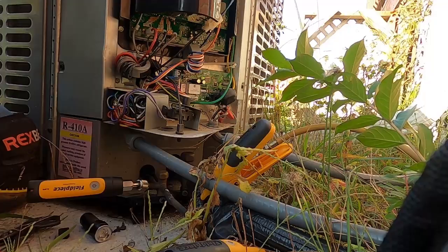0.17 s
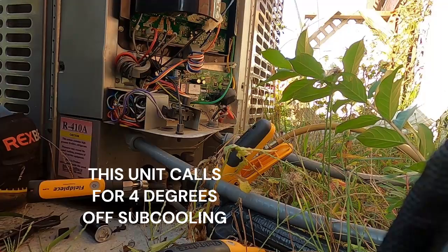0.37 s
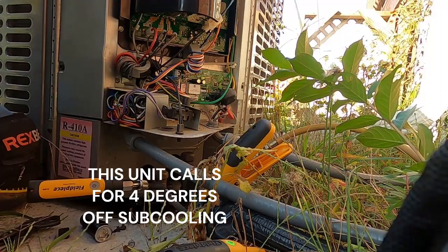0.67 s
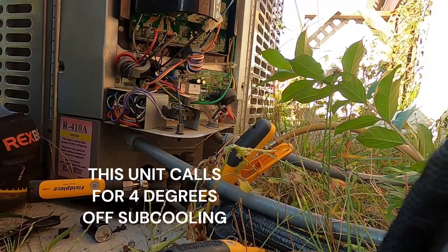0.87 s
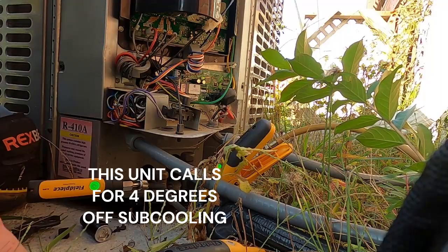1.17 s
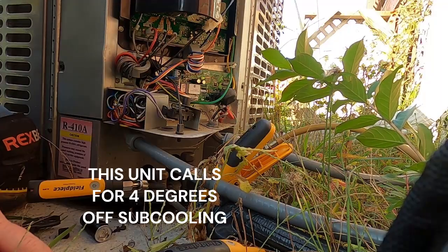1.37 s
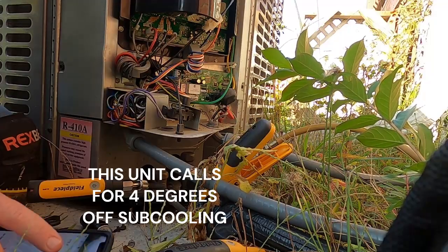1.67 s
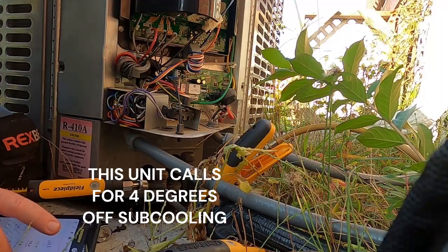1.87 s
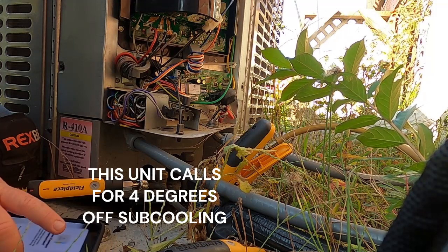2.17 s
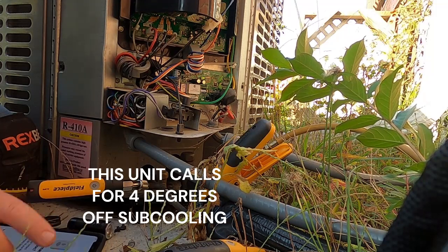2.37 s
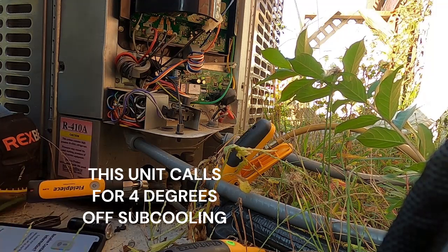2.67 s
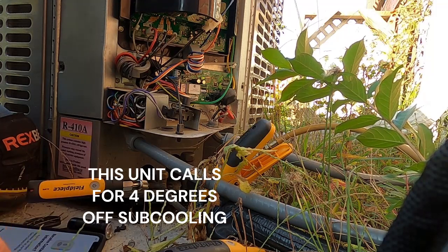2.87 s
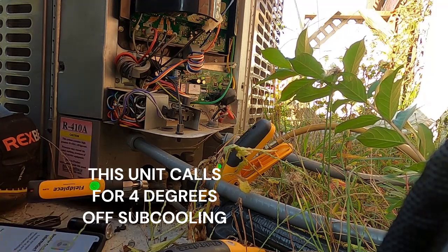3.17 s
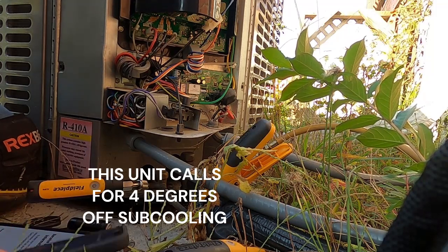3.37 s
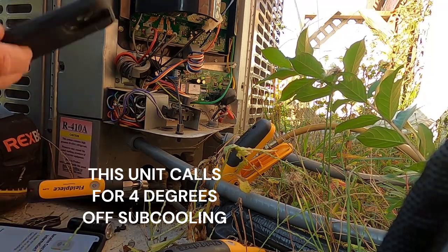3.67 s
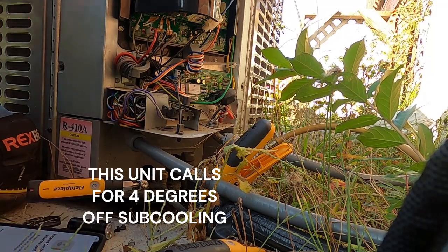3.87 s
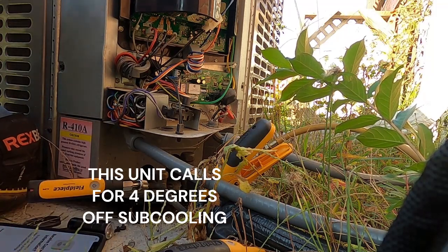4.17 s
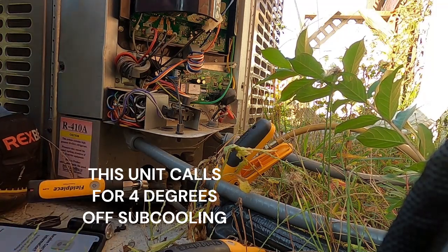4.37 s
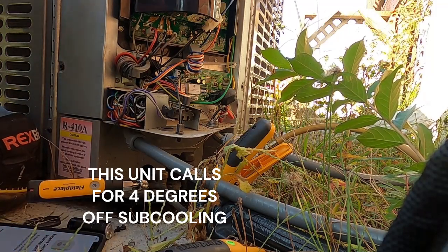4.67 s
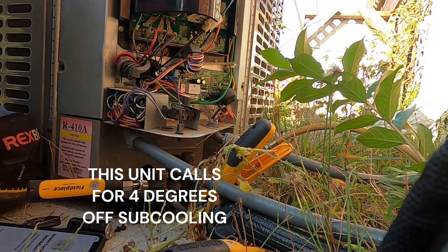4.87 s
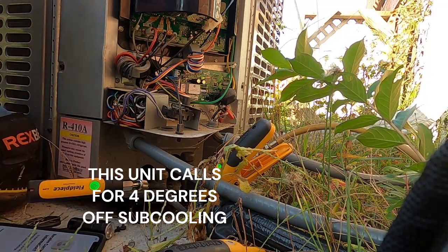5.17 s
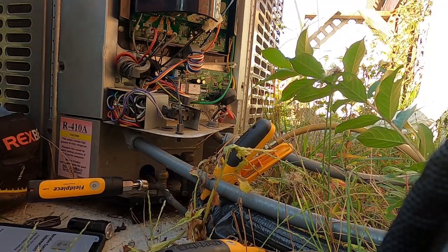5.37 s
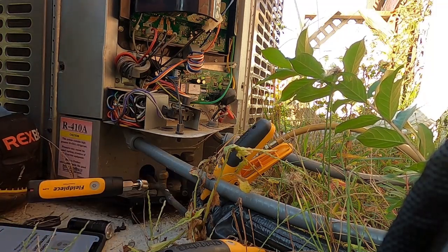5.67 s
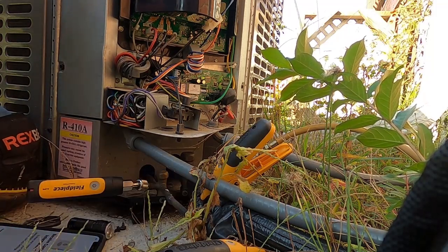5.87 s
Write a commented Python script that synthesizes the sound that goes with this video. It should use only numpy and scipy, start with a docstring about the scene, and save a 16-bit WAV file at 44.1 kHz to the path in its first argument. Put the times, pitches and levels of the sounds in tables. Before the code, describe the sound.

An outdoor air-conditioning unit runs close to the microphone for the whole six seconds. Its compressor and fan make a low, even hum with a steady rush of air, and a thin, very high electronic whine sits mostly on the right. A very short, brighter rush opens the sound and stops abruptly. One motor rises slightly in pitch over the first two seconds, and the airy hiss gradually gets a little brighter. At about 1.9 seconds fingertips make a quick, crisp cluster of clicks on a phone nearby. At 2.4 seconds the phone is set down on concrete with a light clack and a small thump. A faint high whistle swells near 2.8 seconds and fades. Tiny ticks follow around 3.5 seconds and between 4.4 and 4.9. A light breeze gives soft, low puffs on the microphone, most clearly near 1.9 and 5.6 seconds.

```python
"""Outdoors, an air-conditioning unit runs beside a small camera. Its compressor and fan hum (one motor is still
speeding up at first), air rushes through the coil, and the inverter, its power electronics, whines near 12 kHz
in bursts at twice the mains rate, mostly from the right. A short bright burst of noise sounds at the very start
and breaks off, a light breeze puffs at the microphones and a faint whistle swells and fades. Close by,
fingertips tick on a phone and set it down on the concrete."""
import sys
import numpy as np
from scipy import signal
from scipy.fft import rfft, irfft, next_fast_len
from scipy.io import wavfile
from scipy.ndimage import uniform_filter1d, map_coordinates

SR = 44100
rng = np.random.default_rng(int(sys.argv[2]) if len(sys.argv) > 2 else 0)


def materialize(psi):
    """Save the field psi as 16-bit PCM at rate SR to the path in sys.argv[1].

    A 1-D psi becomes a single channel; in a 2-D psi each row is a channel.
    """
    bounded = np.clip(np.atleast_2d(psi).T, -1, 1)
    quanta = np.round(bounded * 32767).astype(np.int16)
    wavfile.write(sys.argv[1], SR, quanta)


N = 265746
t = np.arange(N) / SR

# Something, probably a hand, shades the camera from the unit, then moves away: (time [s], shade [0-1])
SHADE = [(0, 0.49), (1.6, 0.38), (1.9, 0.22), (3.3, 0.1), (4.4, 0.05), (6.1, 0)]


def amp(db):
    """Turn decibels into a gain to multiply by."""
    return 10 ** (np.asarray(db) / 20)


def unit(x):
    """Scale x to an average (rms) level of 1."""
    return x / np.sqrt(np.mean(x ** 2) + 1e-20)


def over_pitch(rows, hz):
    """Read a (frequency, value) table at hz, on a log scale."""
    freqs, values = np.transpose(rows)
    return np.interp(np.log(hz + 1), np.log(freqs + 1), values)


def over_time(rows):
    """Read a (time, value) table at every sample."""
    return np.interp(t, *np.transpose(rows))


def wobble(rate):
    """A smooth random curve through `rate` points a second."""
    coarse = t[::64]
    return np.interp(t, coarse, map_coordinates(rng.standard_normal(400), [coarse * rate]))


def filtered(x, response):
    """Scale each frequency in x by response(frequency)."""
    size = next_fast_len(x.shape[-1] + 8192)
    return irfft(rfft(x, size) * response(np.fft.rfftfreq(size, 1 / SR)), size)[..., :x.shape[-1]]


def resonance(f, centre_hz, width_hz):
    """A response that favours frequencies near the centre."""
    return 1j * f * width_hz / (centre_hz ** 2 - f * f + 1j * f * width_hz)


def motor_turns(full_hz=49.87, slow_share=0.045, spin_up_s=2.15):
    """Count the motor's turns: it starts a little slow and climbs to a slightly unsteady full speed."""
    speed = full_hz * (1 - slow_share * np.clip(1 - t / spin_up_s, 0, 1) + .001 * wobble(9))
    return np.cumsum(speed) / SR


def tones(multiples, levels, turns, waver_db, drift_rad):
    """Pure tones at multiples of a turning speed, each wavering in level and phase."""
    shade, out = over_time(SHADE), np.zeros(N)
    for multiple, (db, shade_db) in zip(multiples, levels):
        gain = np.sqrt(2) * amp(db + shade * shade_db + waver_db * wobble(3.99))
        out += gain * np.sin(2 * np.pi * (multiple * turns + rng.random()) + drift_rad * wobble(3.02))
    return out


def hum(turns, compressor_hz=32.55, blade_hz=36.1):
    """Three spinning parts shake the casing; a few faint, thin tones sit above them."""
    # One row per tone: (level [dB], change in full shade [dB])
    compressor = [(-29.5, 2), (-28, 0.5), (-41.5, 0), (-32.5, 2), (-42.5, -3.5), (-49, 4), (-49.5, 9),
                  (-58, -20)]
    blades = [(-37, 0), (-44.5, 0), (-36.5, 0.0039), (-48, 0)]  # probably the fan blades
    motor = [(-37, -1.5), (-35, -3.5), (-51, 5), (-49, -10), (-49.5, -1), (-63, 14), (-71, 18), (-58, -22),
             (-67, -2), (-68, -12), (-69, -15), (-72, -8), (-63, -16), (-67, -12), (-73, 1)]  # probably the fan motor
    thin = [(-75, -12), (-70.5, -4), (-77.5, 13), (-77, -7), (-72, -11)]
    thin_hz = (5937, 5997, 9805, 9870, 10130)  # the thin tones: (pitch [Hz])
    motor_multiples = (1, 2, 10, 12, 14, 18, 23, 29, 39, 48, 63, 86, 88, 89, 91)
    return (tones((1, 2, 3, 4, 5, 6, 7, 12), compressor, compressor_hz * t, waver_db=1.65, drift_rad=.18)
            + tones((1, 2, 3, 4), blades, blade_hz * t, waver_db=0.5, drift_rad=.14)
            + tones(motor_multiples, motor, turns, waver_db=2.0, drift_rad=.41)
            + tones(thin_hz, thin, t, waver_db=1.0, drift_rad=.65))


def inverter_whine(ripple_hz=119.96, flip_s=2.097):
    """Mains ripple chops two switching tones, making each a row of close tones that add up to bursts."""
    # Tones ripple_hz apart, lowest first: (left level [dB], right level [dB], change in full shade [dB])
    lower_tones = [(-88, -73, -3), (-86, -68, -5), (-84, -70, -3), (-83, -68, -1), (-80, -86, -8),
                   (-88, -62, -7), (-94, -92, 0), (-69, -60, -9), (-69, -47.5, -9), (-61, -48.5, -9),
                   (-58.5, -54.5, 1), (-68, -58, -4), (-82, -87, 0), (-90, -76, 2), (-90, -88, 0),
                   (-95, -75, -5)]
    upper_tones = [(-76, -69, -5), (-65, -65, -5), (-68, -57.5, -15), (-77, -56.5, -23), (-78, -69, -10),
                   (-100, -100, 0), (-92, -73, -8), (-88, -79, -5), (-86, -80, -5), (-92, -82, -5)]
    delay_s = np.array([[.0019], [.0011]])  # the left microphone hears each burst later
    offset_rad = np.array([[-.5], [0]])  # and out of step
    ripple = 2 * np.pi * ripple_hz * (t - delay_s)
    flip = np.pi * np.clip((t - flip_s) / .008 + .5, 0, 1)  # the wave turns upside down once
    shade = over_time(SHADE) * np.array([[.45], [1]])  # mostly on the right
    out = np.zeros((2, N))
    for lowest_hz, rows, middle in ((10691.5, lower_tones, 8), (11989, upper_tones, 3)):
        switch_hz = lowest_hz + middle * ripple_hz
        phase = 2 * np.pi * (switch_hz * t + rng.random()) + .22 * wobble(3) + .04 * wobble(30)
        bursts = sum(amp([[left_db], [right_db]] + shade * shade_db)
                     * np.cos(phase + flip + offset_rad + (k - middle) * ripple)
                     for k, (left_db, right_db, shade_db) in enumerate(rows))
        out += np.sqrt(2) * bursts * amp([0.64 * wobble(3.8), .7 * wobble(3.9)])
    return out


def rush(spectrum, patchy_db):
    """Swirling air: stereo noise with random louder and softer patches in time and pitch."""
    # How alike the two sides sound: (frequency [Hz], likeness [0-1])
    likeness = [(30, 0.91), (130, 1), (280, 1), (620, 1), (1350, 0.8), (2500, 0.5), (3300, 0.89),
                (6370, 0.6), (9000, 0.37), (13900, 0.59)]
    slices = signal.stft(rng.standard_normal((2, N)), nperseg=512)[2]
    patches = uniform_filter1d(rng.standard_normal(slices.shape[1:]), size=5, axis=0)
    patches = uniform_filter1d(patches, size=10, axis=1)
    noise = signal.istft(slices * amp(patchy_db * unit(patches)), nperseg=512)[1][:, :N]

    def colour(hz):
        angle = np.arccos(np.clip(over_pitch(likeness, hz), -1, 1)) / 2
        return amp(over_pitch(spectrum, hz)) * [np.cos(angle), np.sin(angle)]
    mid, side = filtered(noise, colour)  # what the sides share, and how they differ
    return unit(np.array([mid + side, mid - side]))


def fan_air(turns):
    """Churning air makes a low rumble, the fan's main rush and a hiss through the fins."""
    # The tone colour of each noise: (frequency [Hz], relative level [dB])
    rumble = [(12, -17), (30, -6), (60, 5), (130, 1.5), (190, -7), (240, 1.5), (290, -15), (400, -66)]
    body = [(130, -0.5), (220, -8), (295, -7.5), (418, -4), (481, -3.5), (557, -8), (681, -3.5), (742, -8),
            (900, -10.5), (1270, -22), (1400, -46), (1820, -30.5), (3080, -120)]
    hiss = [(900, -3), (1300, 1.5), (2300, -2.5), (2700, -4.5), (4000, -6.5), (4500, -8), (5000, -10.5),
            (6100, -12), (7500, -17), (9000, -24), (10100, -22), (10700, -24), (11400, -20), (11900, -15),
            (12600, -25), (13200, -36), (14400, -44)]
    flow = wobble(2.84)
    pulse = np.cos(2 * np.pi * 2 * turns)  # the motor's pull pulses the rush twice a turn
    out = amp(-36 + 0.18 * wobble(1.8)) * rush(rumble, patchy_db=3.5)
    out += amp(-35.5 + 0.54 * flow + 0.5 * pulse) * rush(body, patchy_db=0.82)
    hiss_db = -46.5 - 5.5 * over_time(SHADE) + 0.48 * flow + 0.62 * wobble(25)
    return out + amp(hiss_db) * rush(hiss, patchy_db=0.7)


def opening_rush(end_s=0.069):
    """A short, bright burst of noise at the very start that stops abruptly."""
    # Its tone colour: (frequency [Hz], relative level [dB])
    spectrum = [(150, -23), (300, -1), (700, -3), (1300, -7), (4500, -17.5), (7000, -27), (9000, -37),
                (14000, -60)]
    return amp(-36) * np.clip((end_s - t) / 0.0018, 0, 1) * rush(spectrum, patchy_db=1.0)


def stereo_width(close_s=0.072, reopen_s=0.56, ease_s=2.2):
    """The sound starts wide, snaps to the centre, then widens again ever more slowly."""
    wide_start = np.clip((close_s - t) / .02 + .5, 0, 1)
    reopening = 1 - np.exp(-np.clip(t - reopen_s, 0, None) / ease_s)
    return amp(5.5) * wide_start + amp(1) * reopening + amp(-46)


def breeze(swell_s=0.03):
    """Wind pushes on each microphone separately: low puffs over a weaker stirring."""
    # The strongest puffs: (time [s], level [dB])
    puffs = [(.77, -44), (1.551, -38), (1.839, -32.5), (1.969, -33), (2.202, -41), (3.149, -39),
             (4.278, -39.5), (5.568, -27.5)]

    def low_noise(samples, top_hz):
        noise = rng.standard_normal((2, samples))
        return unit(filtered(noise, lambda f: (f > 12) / (1 + (f / top_hz) ** 3)))
    out = stereo_width() * amp(-47.5 + 7.5 * wobble(21)) * low_noise(N, top_hz=70)
    for at_s, db in puffs:
        start, end = round((at_s - .2) * SR), round((at_s + .2) * SR)
        top_hz = max(100 + 4 * (db + 40), 30)  # stronger puffs reach higher
        swell = np.exp(-.5 * ((t[start:end] - at_s) / swell_s) ** 2)
        out[:, start:end] += amp(db) * swell * low_noise(end - start, top_hz)
    return out


def whistle(centre_hz=4450, width_hz=160):
    """A narrow band of hiss near 4.4 kHz that swells and fades around the motor's high tones."""
    # Its rise and fall: (time [s], level [dB])
    swell = [(1.5, -75), (2.8, -58), (4.2, -80), (5.2, -82), (6.1, -72)]
    gain = amp(over_time(swell) + 1.6 * wobble(8))
    return gain * unit(filtered(rng.standard_normal(N), lambda f: resonance(f, centre_hz, width_hz) ** 2))


def phone_case(f):
    """How strongly the phone's case answers a touch at each frequency f."""
    # Where it rings: (pitch [Hz], width [Hz], level [dB])
    rings = [(1760, 750, 0.5), (2430, 510, 5), (3790, 350, -4), (4700, 370, 2), (5300, 630, -6),
             (6530, 540, 0), (7500, 190, -11), (10700, 190, -13)]
    ringing = sum((-1) ** k * amp(db) * resonance(f, hz, width_hz)
                  for k, (hz, width_hz, db) in enumerate(rings))
    return amp(-14) / (1 + (f / 7000) ** 2) + ringing


def phone(snap=7.4, scuff_s=2.4122, scuff_hz=5500):
    """Each touch rings the phone's case; set down, it slides briefly and thumps the concrete."""
    # Touches of fingers and edges: (time [s], peak level [dB], centre pitch [Hz], time to fade 60 dB [s])
    ticks = [(1.939, -20, 6000, .012), (1.9445, -13, 4860, 0.026), (1.953, -15.5, 4600, 0.026),
             (1.962, -26.5, 5200, 0.072), (1.966, -29, 4800, .015), (2.4124, -21, 2190, 0.083),
             (2.426, -43, 5500, .02), (2.4427, -17, 3700, 0.014), (2.447, -31, 3350, 0.11),
             (3.55, -38, 2500, .03), (4.3717,  -36, 5300, .008), (4.603, -35, 2190, .012),
             (4.724, -31, 3000, .012), (4.846, -33, 2500, .012)]
    # The concrete's low notes: (pitch [Hz], level [dB], time to fade 60 dB [s])
    slab_notes = [(133, -13, 0.044), (191, -17.5, 0.059), (234, -21.5, 0.19), (436, -18, 0.015),
                  (636, -15.5, 0.037)]
    # Two edges land: (time [s], direction of the push [+1 or -1], gain [dB])
    landings = [(2.4142, -1, -7), (2.4172, 1, 1.5)]
    out, age = np.zeros(N + SR), np.arange(SR // 8) / SR
    for at_s, db, hz, fade_s in ticks:
        # one sharp blow, then dying noise
        touch = snap * (age == 0) + rng.standard_normal(len(age)) * amp(-60 * age / fade_s)
        click = filtered(touch, lambda f: phone_case(f) * resonance(f, hz, 1.33 * hz) ** 4)
        out[round(at_s * SR):][:len(age)] += amp(db) * click / np.abs(click).max()
    grit = filtered(rng.standard_normal(len(age)),
                    lambda f: (phone_case(f) + amp(-9)) * resonance(f, scuff_hz, 2.3 * scuff_hz) ** 4)
    scuff_db = -32 - 60 * np.clip(age - 0.0094, 0, None) / 0.051  # holds a moment, then fades
    out[round(scuff_s * SR):][:len(age)] += unit(grit) * amp(scuff_db)
    thump = sum(amp(db - 60 * age / fade_s) * np.sin(2 * np.pi * hz * age) for hz, db, fade_s in slab_notes)
    for at_s, sign, db in landings:
        out[round(at_s * SR):][:len(age)] += sign * amp(db) * thump
    return out[:N]


def scene():
    """Most sounds lean slightly left but arrive on the right first; whine and breeze go their own way."""
    # Balance of the microphones: (frequency [Hz], left louder than right [dB])
    lean = [(60, 0), (200, 1), (670, 2), (7600, 2.5), (9500, 2), (11800, -23)]
    # Lag between them: (frequency [Hz], left behind right [rad])
    lag = [(30, -0.012), (130, -0.012), (230, 0.053), (500, 0.27), (1100, 0.38), (1900, 0.44), (3000, .4),
           (4400, 0.74), (6000, 0.99), (9000, 0.73)]

    def microphones(hz):
        balance = amp(np.outer([.5, -.5], over_pitch(lean, hz)))
        return balance * np.exp(1j * np.outer([-.5, .5], over_pitch(lag, hz)))
    turns = motor_turns()
    sources = hum(turns) + whistle() + fan_air(turns) + opening_rush() + phone()
    left, right = filtered(sources, microphones)
    mid, side = (left + right) / 2, stereo_width() * (left - right) / 2
    return np.array([mid + side, mid - side]) + inverter_whine() + breeze()


def record(dry):
    """The camera keeps nothing above 14450 Hz."""
    return filtered(dry, lambda hz: hz < 14450)


dry = scene()
out = record(dry)
materialize(out)
```